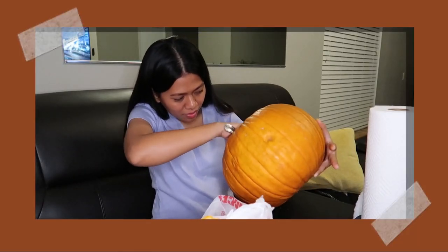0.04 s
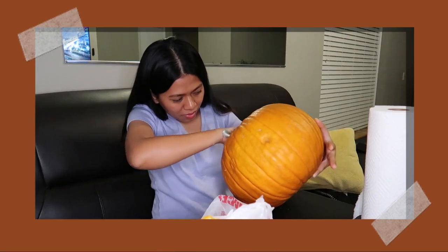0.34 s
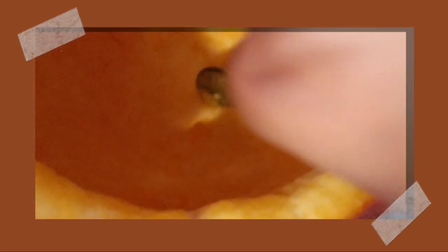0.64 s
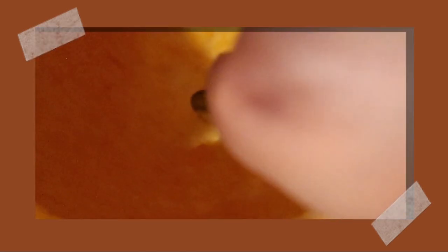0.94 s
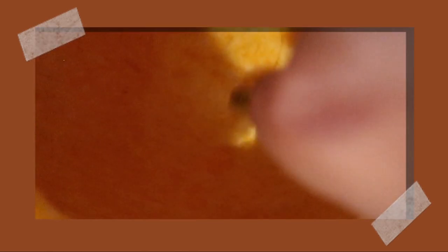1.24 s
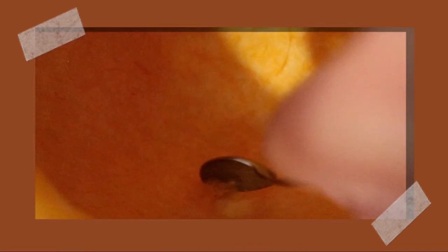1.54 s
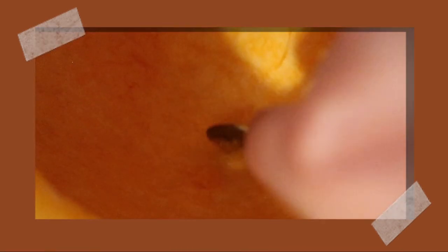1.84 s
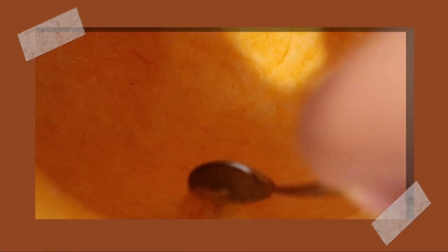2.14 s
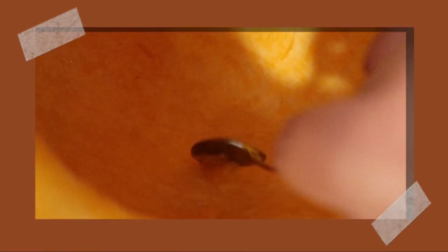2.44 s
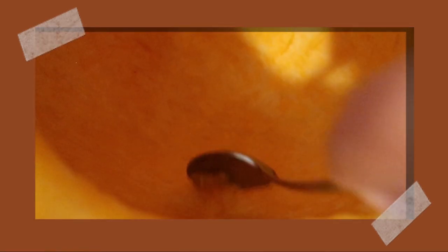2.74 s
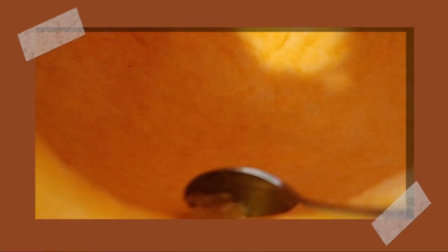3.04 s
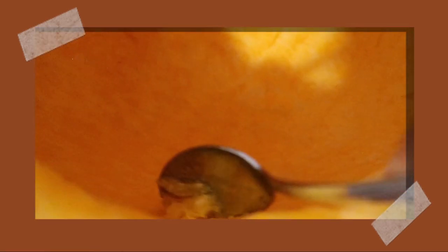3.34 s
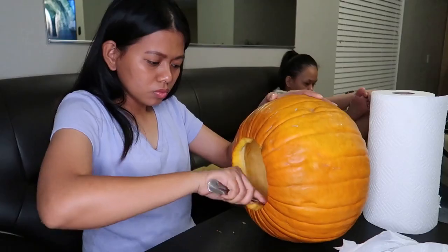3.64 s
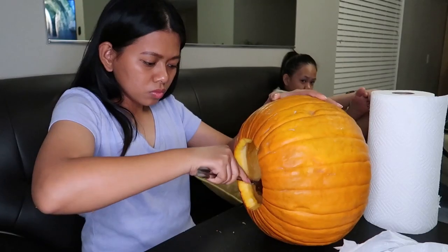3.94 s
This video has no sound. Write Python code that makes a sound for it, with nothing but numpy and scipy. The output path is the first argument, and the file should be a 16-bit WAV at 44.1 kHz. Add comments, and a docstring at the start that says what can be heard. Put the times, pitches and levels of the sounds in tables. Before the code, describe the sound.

Scraping of a metal spoon on wet pumpkin flesh comes in separate, juddering strokes that make the hollow shell resonate and thud. The middle strokes are close and crisp; the first and last sound duller, from across a quiet room.

```python
"""Scraping out a hollow pumpkin

A metal spoon scrapes in separate strokes in a living room, the first and last heard from farther off.
Stick-slip friction tears wet fibres, whose impulses excite the spoon's damped modes, while the drag
drives the air cavity into a resonant boom. The spoon also bumps the wall and clinks, and the pulp ticks.
These have a short reverberation; one dry click sounds without it, over a faint rumble and hiss."""
import sys
import numpy as np
from scipy import signal
from scipy.fft import rfft, irfft, next_fast_len
from scipy.io import wavfile
from scipy.ndimage import uniform_filter1d, map_coordinates

SR = 44100
rng = np.random.default_rng(int(sys.argv[2]) if len(sys.argv) > 2 else 0)


def wav_record(signal):
    """Record a signal, one row per channel, as 16-bit PCM in the file named by sys.argv[1]."""
    frames = np.transpose(np.atleast_2d(signal))
    bounded = np.clip(frames, -1, 1)
    # unit amplitude maps onto the largest positive 16-bit level
    quanta = np.round(bounded * 32767).astype(np.int16)
    wavfile.write(sys.argv[1], SR, quanta)


N = 176400


def tearing(tears_per_s=1700, spread_db=4.8, smear_db=-6, slips_per_s=320, slip_db=2, pocket_db=3.5):
    """Stick-slip friction: fibres tear in random clumps over a wet smear, giving two force signals."""
    tears = (rng.random(N) < tears_per_s / SR) * amp(spread_db * rng.standard_normal(N))
    force = unit(tears * rng.choice([-1, 1], (2, N))) + amp(smear_db) * rng.standard_normal((2, N))
    spectra = signal.stft(force * amp(slip_db * wobble(slips_per_s)), nperseg=512)[2]
    # Pockets of pulp colour the tearing for a moment each.
    pockets = uniform_filter1d(rng.standard_normal(spectra.shape[1:]), size=3, axis=0)
    pockets = uniform_filter1d(pockets, size=6, axis=1)
    force = signal.istft(spectra * amp(pocket_db * unit(pockets)), nperseg=512)[1][:, :N]
    return even(force, size=400)


def grip(t, length, rise_s, fall_db_per_s):
    """Friction envelope: the rim digs in, drags for a while and slips free."""
    rise = (1 - np.exp(-np.maximum(t, 0) / rise_s)) ** 2
    return rise * amp(-np.minimum(fall_db_per_s * np.maximum(t - length, 0), 200))


def drive(catches, rise_s, fall_db_per_s):
    """Incoherent addition: the envelopes of catches (t/s, duration/s, level/dB) sum in power."""
    t = np.arange(N) / SR
    power = sum((amp(db) * grip(t - s, length, rise_s, fall_db_per_s)) ** 2 for s, length, db in catches)
    return np.sqrt(power)


# Catches of the rim, a run to each stroke: t/s, duration/s, relative rasp level/dB, relative boom level/dB
CATCHES = [(1.278, 0.042, -38.5, -19), (1.342, 0.028, -37.5, -38), (1.457, 0.013, -29.5, -19.5),
           (1.469, 0.029, -24, -13.5), (1.497, 0.032, -58, -19.5), (1.517, 0.011, -29.5, -25.5),
           (1.53, 0.024, -36.5, -26.5), (1.848, 0.033, -31.5, -25), (1.886, 0.027, -34, -30),
           (1.921, 0.04, -29, -19.5), (1.999, 0.046, -31.5, -20), (2.049, 0.021, -31.5, -15.5),
           (2.1, 0.026, -28.5, -17.5), (2.144, 0.017, -36.5, -19), (2.162, 0.04, -41.5, -32),
           (2.45, 0.031, -32, -22.5), (2.496, 0.043, -38, -21.5), (2.523, 0.018, -34, -20.5),
           (2.557, 0.013, -30.5, -17.5), (2.687, 0.077, -36.5, -28.5), (2.742, 0.046, -32, -21),
           (2.782, 0.031, -29, -11.5), (2.82, 0.021, -33, -22.5), (2.852, 0.092, -51, -39),
           (2.957, 0.073, -42.5, -35.5), (3.045, 0.075, -55, -38), (3.252, 0.031, -49, -46),
           (3.304, 0.036, -41.5, -33)]
# The spoon's higher modes, damped by the pulp: f/Hz, bandwidth/Hz, gain/dB
SPOON_MODES = [(1390, 1670, 3.5), (2770, 1470, 9.5), (3565, 320, 4), (5770, 750, 1), (6640, 1000, -1.5),
               (10470, 1470, -8), (13430, 290, 3.5), (14300, 390, -15.5)]
# The bowl's resonance, moving with the way the spoon lies on the wall: t/s, f/Hz
BOWL_PITCH = [(1.47, 2930), (1.52, 3510), (1.85, 2880), (2.1, 3202)]
# Spectrum of the crackle radiated straight from the flesh: f/Hz, level/dB
FIBRE_SPECTRUM = [(200, -32), (650, -1.5), (900, -19), (1500, 3), (3900, -5.5), (5000, 0), (9200, -6.5),
                  (15000, -11)]
# Stereo width of the tearing: f/Hz, side-to-mid ratio/dB
RASP_WIDTH = [(2000, -59), (4400, -26), (8000, -1.5), (15000, -6)]
RASP_RISE_S, RASP_FALL_DB_PER_S = 0.002, 693

def near_rasp(gain_db=-4, fibre_db=-3, bowl_width_hz=350, bowl_db=13.5):
    """Forced vibration: tearing drives the spoon's modes, which shift a little from catch to catch."""
    force = np.pad(tearing(), ((0, 0), (0, SR)))
    out = np.zeros((2, N + SR))
    t = np.arange(SR // 7) / SR
    for s, length, db, _ in CATCHES:
        here = slice(round(s * SR), round(s * SR) + len(t))
        bowl_hz = np.interp(s, *np.transpose(BOWL_PITCH)) * (1 + 0.029 * rng.uniform(-1.2, 1))
        modes = [(hz * (1 + 0.013 * rng.normal()), width, mode_db + 1.5 * rng.normal())
                 for hz, width, mode_db in SPOON_MODES]
        envelope = grip(t, length, RASP_RISE_S, RASP_FALL_DB_PER_S)
        push = force[:, here] * envelope
        metal = unit(ring(push, modes + [(bowl_hz, bowl_width_hz, bowl_db)]))
        crackle = amp(fibre_db) * coloured(push, FIBRE_SPECTRUM)
        out[:, here] += amp(db + gain_db) * np.sqrt(np.mean(envelope ** 2)) * unit(metal + crackle)
    return widen(out[:, :N], RASP_WIDTH)


# Catches heard across the room: t/s, duration/s, relative rasp level/dB, relative boom level/dB
FAR_CATCHES = [(0, 0.039, -50, -44.5), (0.278, 0.12, -58.5, -53), (0.367, 0.01, -42, -31.5),
               (.394, 0.08, -53.5, -42), (3.636, 0.037, -37.5, -17), (3.698, 0.049, -39.5, -24),
               (3.741, 0.186, -44.5, -34), (3.821, 0.035, -40, -33), (3.94, 0.13, -38.5, -29)]
# Spectrum of the distant rasp: f/Hz, level/dB
FAR_SPECTRUM = [(200, -32), (480, 10), (750, 3), (1300, -4), (3100, 2), (5000, -17.5), (9000, -25.5),
                (15000, -27)]

def far_rasp(gain_db=3):
    """High-frequency attenuation: from outside the pumpkin the tearing is duller."""
    catches = [(s, length, db) for s, length, db, _ in FAR_CATCHES]
    envelope = amp(gain_db) * drive(catches, RASP_RISE_S, RASP_FALL_DB_PER_S)
    return widen(envelope * coloured(tearing(), FAR_SPECTRUM), RASP_WIDTH)


# Modes of the hollow pumpkin: f/Hz, bandwidth/Hz, gain/dB
PUMPKIN_MODES = [(102.8, 38, -9.5), (161.7, 54, -2.5), (207.6, 17, -1), (269.5, 33.7, 3), (333.4, 35, -6),
                 (398, 13.3, -21.5)]
# Swells where the rim's chatter locks to the cavity's note: t/s, duration/s, level/dB
GROANS = [(1.496, 0.045, -14.5), (1.93, 0.038, -24), (2.535, 0.017, -18.5), (2.798, 0.016, -13.5)]
# Transmission through the soft wall: f/Hz, gain/dB
WALL_TRANSMISSION = [(35, -4), (80, -3), (330, 0.5), (600, 2)]

def cavity_boom(near_db=-2, far_db=-1, groan_hz=266.8, groan_db=-2.5, rise_s=0.0058, fall_db_per_s=353):
    """Cavity resonance: the juddering drag shakes the wall and sets the air groaning at its own pitch."""
    drags = [(s, length, db + near_db) for s, length, _, db in CATCHES]
    drags += [(s, length, db + far_db) for s, length, _, db in FAR_CATCHES]
    drag = drive(drags, rise_s, fall_db_per_s)
    swell = drive(GROANS, rise_s, fall_db_per_s)
    judder = even(ring(tearing()[0], PUMPKIN_MODES), size=600)
    groan = unit(np.sin(2 * np.pi * groan_hz * np.arange(N) / SR + 0.79 * wobble(25)))
    inside = drag * judder + np.hypot(amp(groan_db) * drag, swell) * groan
    return filtered(inside, lambda hz: amp(along(WALL_TRANSMISSION, hz)))


# Blows of the spoon on the wall: t/s, relative level/dB, f/Hz
BUMPS = [(0.0, -24, 254), (0.06, -20.5, 237), (0.375, -33, 298), (0.478, -20.5, 279), (0.494, -20.5, 241),
         (0.554, -23.5, 229), (0.613, -16.5, 241), (0.647, -25, 243), (0.73, -10, 234.5), (0.844, -31, 196),
         (.928, -32.5, 204), (1.218, -23, 253), (1.309, -12.5, 218), (1.372, -22, 242), (1.821, -8, 247),
         (2.403, -13, 247.7), (3.637, -13, 421.5), (3.642, -5.5, 267), (3.656, -10, 269), (3.713, -17, 245)]

def wall_bumps(gain_db=1, peak_s=0.0053, rise_s=0.0036, fall_s=0.0073, ring_db=-8):
    """Soft impact: each blow gives a rounded thud and a weaker rebound, and leaves the cavity ringing."""
    thuds = np.zeros(N)
    for s, db, hz in BUMPS:
        for delay_s, loss_db in [(0, 0), (0.01365, -10.5)]:  # blow, rebound
            t = np.arange(N) / SR - s - delay_s
            width_s = np.where(t < peak_s, rise_s, fall_s)
            envelope = np.exp(-np.minimum(((t - peak_s) / width_s) ** 2, 20))
            thuds += amp(db + loss_db + gain_db) * envelope * np.sin(2 * np.pi * hz * t)
    return thuds + amp(ring_db) * np.std(thuds) * unit(ring(thuds, PUMPKIN_MODES))


# Pulp snapping under the rim: t/s, relative level/dB
SNAPS = [(0.611, -44), (.647, -41.5), (1.173, -43.5), (0.722, -46), (1.892, -41), (2.148, -29.5),
         (2.401, -40), (1.821, -41), (3.239, -45), (2.355, -52), (3.451, -46.5), (3.521, -45)]
# Spectrum of a snap: f/Hz, level/dB
SNAP_SPECTRUM = [(500, -13), (2800, 8), (4400, 0), (5800, -1.5), (13500, -12)]

def pulp_snaps(gain_db=1):
    """Fracture: parting pulp gives short, wet bursts of tearing noise."""
    envelope = sum(amp(db + gain_db) * strike(s, attack_s=0.00058, t60_s=0.054)[1] for s, db in SNAPS)
    return widen(envelope * coloured(tearing(), SNAP_SPECTRUM), RASP_WIDTH)


# Clinks of the rim: t/s, level/dB
CLINKS = [(1.172, -31), (3.719, -24.5)]

def spoon_clinks(hz=2566):
    """Damped free vibration: the spoon's bowl rings briefly against the pulp."""
    out = np.zeros(N)
    for s, db in CLINKS:
        t, envelope = strike(s, attack_s=0.00044, t60_s=0.059)
        out += amp(db) * envelope * np.sin(2 * np.pi * hz * t + 1.4 * wobble(600))
    return out


def dry_click(start_s=0.5122, db=-26, t60_s=0.0033):
    """Broadband transient: one step with exponential decay, alike in both ears."""
    t = np.arange(N) / SR - start_s
    return (t >= 0) * amp(db - 60 * np.clip(t / t60_s, 0, 10))


# Reverberation time of the living room: f/Hz, T60/s
ROOM_T60 = [(1500, 0.26), (10000, 0.38)]

def reverberation(x):
    """Diffuse field: x is convolved with noise that decays exponentially in each band."""
    hz, t, spectra = signal.stft(rng.standard_normal((2, SR // 2)), SR, nperseg=256)
    tail = signal.istft(spectra * amp(-60 * t / along(ROOM_T60, hz)[:, None]), SR, nperseg=256)[1]
    return signal.fftconvolve(np.atleast_2d(x), tail / np.linalg.norm(tail[0]), axes=1)[:, :N]


# Spectrum of the room's background: f/Hz, level/dB
AMBIENT_SPECTRUM = [(20, -0.5), (140, 2), (380, -2.5), (750, -16.5), (5000, -28), (15500, -44.5)]
# Stereo width of the background: f/Hz, side-to-mid ratio/dB
AMBIENT_WIDTH = [(250, -11), (900, 1), (8000, -0.5)]

def ambient_noise(mid_db=-48.5):
    """Stationary noise: the room's quiet rumble and hiss."""
    return amp(mid_db) * widen(coloured(rng.standard_normal((2, N)), AMBIENT_SPECTRUM), AMBIENT_WIDTH)


def amp(db):
    """Decibels to amplitude ratio."""
    return 10 ** (np.asarray(db) / 20)


def unit(x):
    """Normalisation to rms 1."""
    return x / np.sqrt(np.mean(x ** 2) + 1e-20)


def even(x, size):
    """Running normalisation to rms 1 over stretches of size samples."""
    power = uniform_filter1d(uniform_filter1d(x ** 2, size), size)
    return x / np.sqrt(np.abs(power) + 1e-12)


def along(points, hz):
    """Interpolation of (f/Hz, value) points on a log frequency axis."""
    f, values = np.transpose(points)
    return np.interp(np.log(hz + 1), np.log(f + 1), values)


def wobble(rate):
    """Smooth random modulation with rate knots a second."""
    return map_coordinates(rng.standard_normal(int(N * rate / SR) + 4), [np.arange(N) * rate / SR])


def strike(s, attack_s, t60_s):
    """Time since s, and an envelope with a soft onset and exponential decay."""
    t = np.maximum(np.arange(N) / SR - s, 0)
    return t, (1 - np.exp(-t / attack_s)) ** 2 * amp(-60 * np.minimum(t / t60_s, 10))


def filtered(x, response):
    """Linear filtering: the spectrum of x times a frequency response."""
    n = x.shape[-1]
    padded = next_fast_len(n + 8192)
    return irfft(rfft(x, padded) * response(np.fft.rfftfreq(padded, 1 / SR)), padded)[..., :n]


def coloured(x, points):
    """Spectral shaping by (f/Hz, level/dB) points, at rms 1."""
    return unit(filtered(x, lambda hz: amp(along(points, hz))))


def ring(x, modes):
    """Modal superposition: x through parallel resonances, each squared for steep sides."""
    def response(f):
        return sum(amp(db) * (1j * f * width / (hz * hz - f * f + 1j * f * width)) ** 2
                   for hz, width, db in modes)
    return filtered(x, response)


def widen(pair, side_db):
    """Mid-side stereo from two uncorrelated signals."""
    side = filtered(pair[1], lambda hz: amp(along(side_db, hz)))
    return np.array([pair[0] + side, pair[0] - side])


def scene():
    """Superposition of direct sound, reverberation and background."""
    near = near_rasp() + pulp_snaps() + spoon_clinks()
    far = far_rasp()
    body = cavity_boom() + wall_bumps()
    reverberant = reverberation(amp(-13.5) * near + amp(-10) * far + amp(-49) * body)
    return near + far + body + reverberant + dry_click() + ambient_noise()


def record(dry):
    """Band limiting: the deep bass is thinned and the highest treble cut off."""
    low_cut_hz, top_hz = 36.4, 15600
    return filtered(dry, lambda hz: (hz < top_hz) * hz ** 2 / (hz ** 2 + low_cut_hz ** 2))


dry = scene()
out = record(dry)
wav_record(out)
```